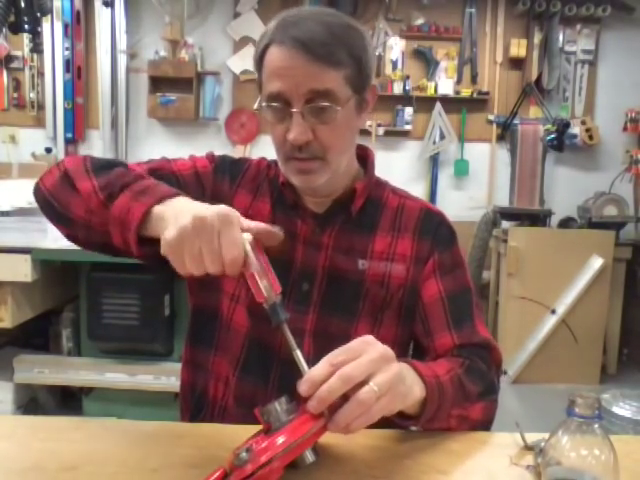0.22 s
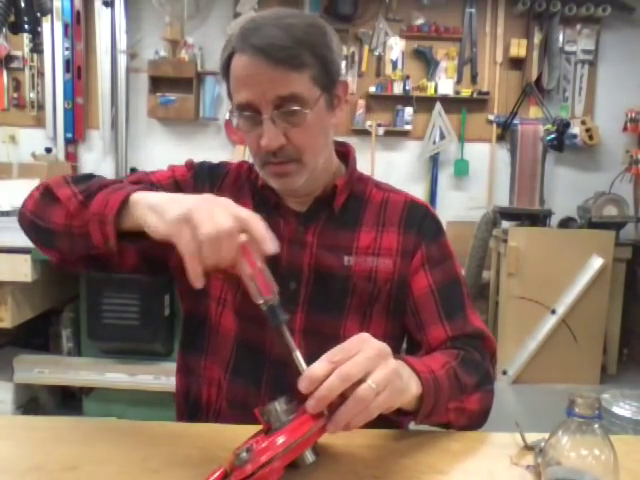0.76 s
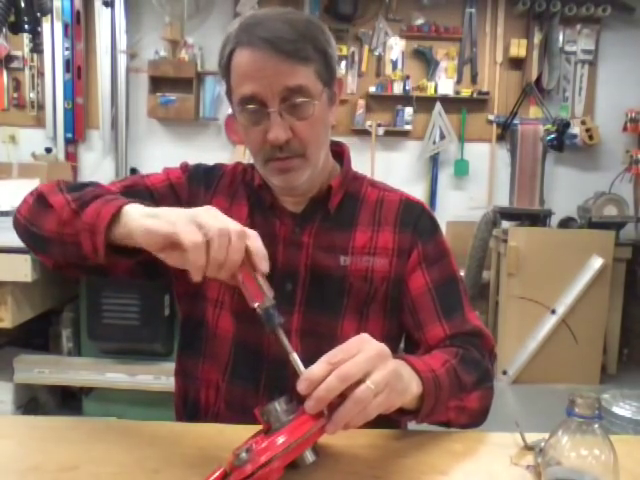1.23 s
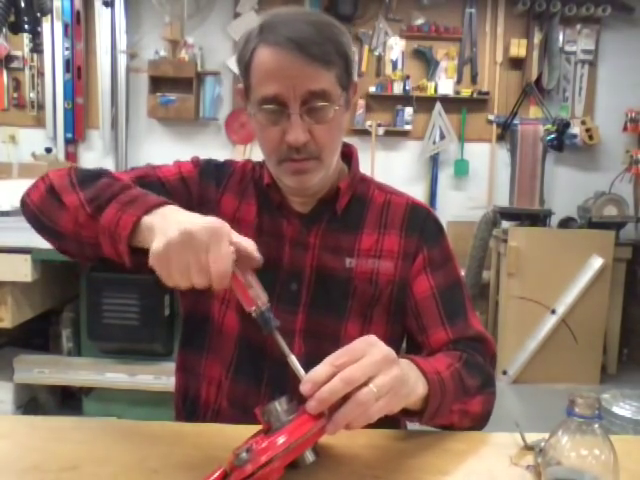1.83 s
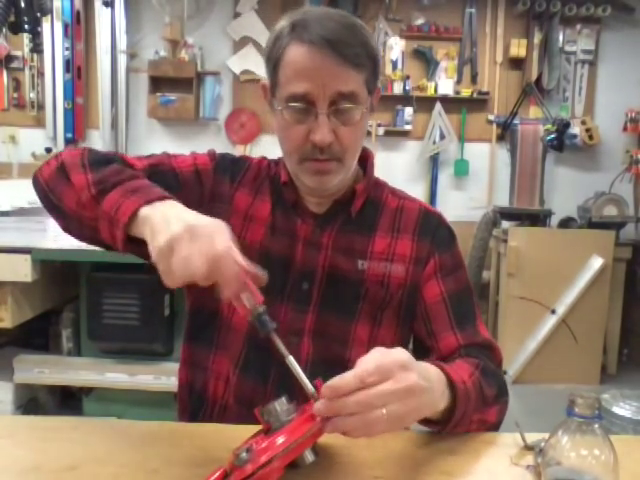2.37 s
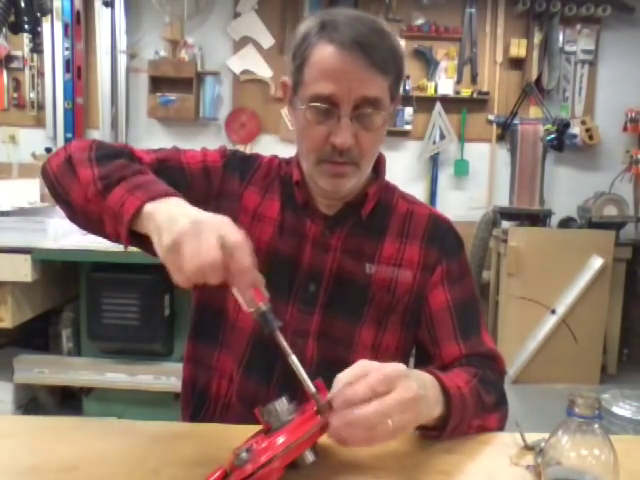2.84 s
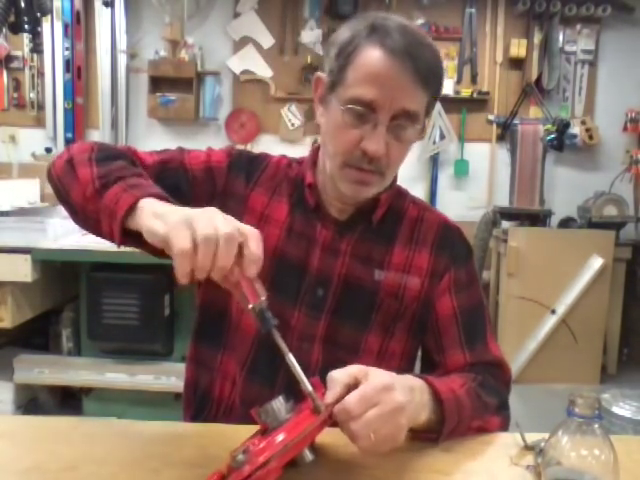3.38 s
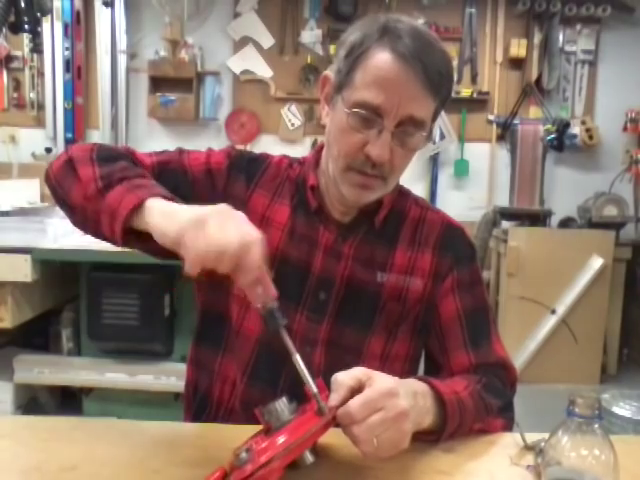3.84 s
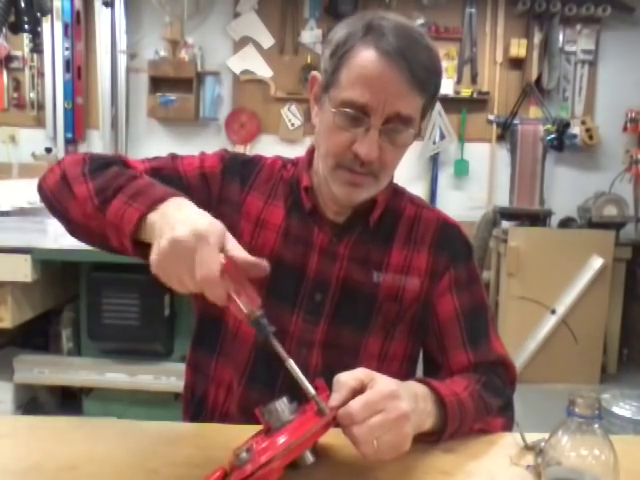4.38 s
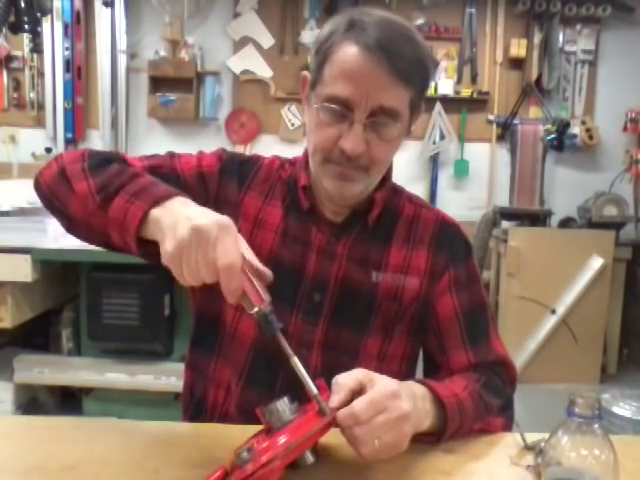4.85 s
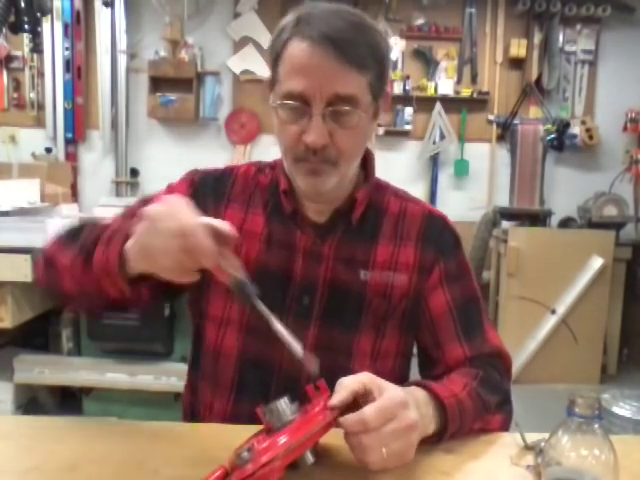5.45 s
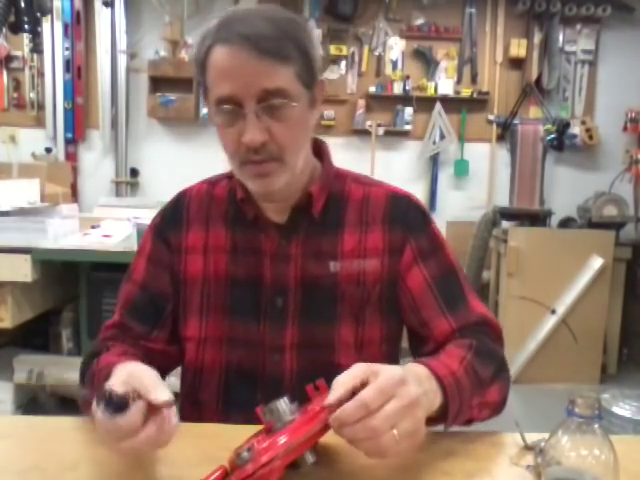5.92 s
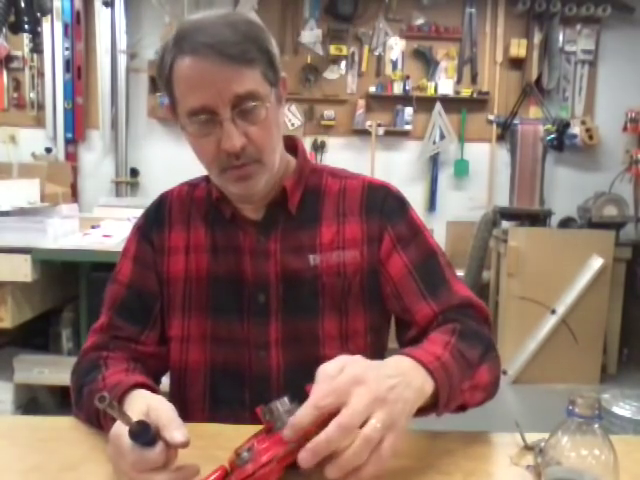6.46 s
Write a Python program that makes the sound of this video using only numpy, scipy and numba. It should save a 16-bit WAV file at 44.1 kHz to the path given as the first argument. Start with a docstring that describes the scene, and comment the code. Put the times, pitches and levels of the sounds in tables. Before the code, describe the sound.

A hand screwdriver clicks brightly and irregularly against small screws while a metal part bumps softly on a wooden bench in a workshop.

```python
"""Hiss and a pulsing high whine from a small microphone, then knocks on a wooden bench in a workshop.
A hand screwdriver turns small screws in a metal part on that bench: each blow of the steel bit, and
each knock of the part, rings a set of decaying modes. Grainy noise through the bench modes is the drag.
Echoes and a noise tail are the walls' answer; an expander holds the pauses down."""
import sys
import numpy as np
from scipy import signal
from scipy.fft import rfft, irfft
from scipy.io import wavfile
from scipy.ndimage import uniform_filter1d
from numba import njit

SR = 44100
rng = np.random.default_rng(int(sys.argv[2]) if len(sys.argv) > 2 else 0)


def transcribe(u):
    """Save the signal u as a 16-bit wav file named by the first command-line argument.

    u: samples, shape (n,) or (channels, n), limited to [-1, 1]; the rate is SR.
    q: integer samples, one column per channel.
    """
    v = np.clip(np.atleast_2d(u).T, -1, 1)
    q = np.round(v * 32767).astype(np.int16)
    wavfile.write(sys.argv[1], SR, q)


N = 295637

# modes of the wooden bench, for knocks and drag: (frequency [Hz], relative level [dB])
BENCH_MODES = [(78, -27), (101, 5), (126, -4.5), (170, 2), (226, -5.5), (257, 1.5), (320, 0), (420, 3.5),
               (540, 9), (630, 5), (880, 10.5), (1080, 11), (1400, 7), (2000, -11)]
BENCH_CYCLES = 8  # vibrations until a bench mode is 60 dB down

# the whole shop; the clutter close by and its lead over the shop
SHOP_T60_S, NEAR_T60_S, NEAR_DB = 0.47, 0.17, 2
TAIL_RISE_S = 0.00066

# bit in the screw head: the greatest bounce is relative to the first contact
BIT_CHATTER_S, BIT_BOUNCE, BIT_SPREAD_OCT = 0.006, 0.72, 0.33
BIT_TAIL_DB, BIT_TAIL_HZ = -28.5, 9300  # tail before the answer gain; duller above this
STEEL_CYCLES, PART_CYCLES, SHAFT_CYCLES = 28, 11, 70  # vibrations until -60 dB

# part against the bench
BENCH_CHATTER_S, BENCH_BOUNCE, BENCH_SPREAD_OCT = 0.01217, 0.58, 0.8
BENCH_TAIL_DB, BENCH_TAIL_HZ = -27, 462
WOOD_PUSH_S = 0.00055  # wood gives way: a longer, duller contact of about this length
BENCH_ANSWER_DB = -1.5  # the shop's answer to a knock at both reference values below
DRIER_DB_PER_DB, SOFT_KNOCK_DB = 0.4, -38  # a harder knock comes through the wood and outruns the shop
DRIER_DB_PER_OCT, DEEP_KNOCK_HZ = -0.5, 200  # a higher knock gets slightly more answer

# microphone: noise levels are those ahead of the expander
HISS_DB, WHINE_DB, WHINE_HZ = -62.5, -71, 14999  # rms; the whine's while it is on
PULSE_HZ, PULSE_START_S, PULSE_SHARE = 14.909, 0.037, 0.56  # share of each period that is on
BASS_CUT_HZ, TOP_HZ = 116, 15560
PAUSE_GAIN_DB, SWELL_KNEE_DB = -12, -75
SWELL_SLOPE = 0.36  # dB of gain per dB of level, well above the knee
SWELL_RISE_S, SWELL_FALL_S = 0.002, 0.04


def undb(db):
    """Amplitude factor of a level in dB."""
    return 10 ** (np.asarray(db) / 20)


def level(x, db):
    """Scale a sound to an rms level in dB."""
    return x * undb(db) / np.sqrt(np.mean(x ** 2))


def fade(t, t60):
    """Exponential decay, 60 dB down after t60 seconds."""
    return np.exp(-np.log(1000) * t / t60)


def coloured(points):
    """Noise with the spectrum of (Hz, dB) points, joined along log frequency."""
    hz, db = np.transpose(points)
    log_f = np.log(np.arange(1, N // 2 + 2) * SR / N)
    white = rfft(rng.standard_normal(N))
    return irfft(white * undb(np.interp(log_f, np.log(hz), db)), N)


def ring(modes, cycles, gains):
    """Answer of an object's modes to one blow, peak 1; high modes die sooner."""
    hz, db = np.transpose(modes)[:, :, None]
    t = np.arange(int(1 + cycles / hz.min() * SR)) / SR
    vibration = fade(t, cycles / hz) * np.sin(2 * np.pi * hz * t)
    sound = np.sum(gains[:, None] * undb(db) * vibration, axis=0)
    return sound / np.abs(sound).max()


def favour(modes, hz, octaves, scatter_db):
    """Each blow lands elsewhere: modes near hz answer most, with chance size and sign."""
    away = np.log2(np.array(modes)[:, 0] / hz) / max(octaves, .03)
    sign, size = rng.standard_normal((2, len(modes)))
    return np.sign(sign) * undb(scatter_db * size) / (1 + away ** 2) ** 0.77


def chatter(length_s, bounce):
    """A first contact and two bounces of chance time and size after it."""
    push = np.zeros(int(.1 * SR))
    when, size = rng.random((2, 2))
    bounce_s = np.clip(when * length_s, 0, .09)
    push[(bounce_s * SR).astype(int)] = bounce * size
    push[0] = 1
    return push


def shop(tail_db, tail_hz, answer_db):
    """Direct sound, near echoes, then a dense tail; it differs from blow to blow as hands and part move."""
    # bench and nearest walls: (delay [s], level before the answer gain [dB])
    reflections = [(.006, -4.5), (.014, -10.5), (.021, -12.5)]
    t = np.arange(int(.4 * SR)) / SR
    decay = fade(t, SHOP_T60_S) + undb(NEAR_DB) * fade(t, NEAR_T60_S)
    dull = signal.lfilter(*signal.butter(1, tail_hz, fs=SR), rng.standard_normal(len(t)))
    room = undb(tail_db) * dull * decay * (1 - np.exp(-t / TAIL_RISE_S))
    for s, db in reflections:
        room[int(s * SR)] += undb(db)
    room *= undb(answer_db)  # echoes and tail against the direct sound
    room[0] = 1
    return room


def add(out, s, db, push, room, *rings):
    """Mix in at time s what the pushes ring, heard through the shop, with its peak at db."""
    size = 24000
    modes = sum(rfft(r, size) for r in rings)
    sound = irfft(rfft(push, size) * rfft(room, size) * modes)
    i = int(s * SR)
    out[i:i + size] += (sound * undb(db) / np.abs(sound).max())[:N - i]


def electronics():
    """The microphone's own noise: hiss, faint steady tones and a high whine switched on and off."""
    # spectrum of the hiss: (frequency [Hz], relative density [dB per Hz])
    hiss_shape = [(15, -44), (25, 1), (44, -7.5), (107, -2.5), (484, -12.5), (898, -14), (1580, -16),
                  (2070, -13.5), (3270, -17.5), (6240, -15.5), (7750, -18.5), (12600, -19), (15600, -15.5)]
    # faint steady tones ahead of the expander: (frequency [Hz], level [dB rms])
    faint_tones = [(9848, -84), (2040, -86)]
    t = np.arange(N) / SR
    on = ((t - PULSE_START_S) * PULSE_HZ) % 1 < PULSE_SHARE
    switch = uniform_filter1d(1. * on, size=88)  # edges of 2 ms
    whine = undb(WHINE_DB) * switch * np.sqrt(2) * np.sin(2 * np.pi * WHINE_HZ * t)
    tones = sum(undb(db) * np.sqrt(2) * np.sin(2 * np.pi * hz * t) for hz, db in faint_tones)
    return level(coloured(hiss_shape), HISS_DB) + whine + tones


def drag():
    """The part dragging on the wood: many tiny slips of chance size ring the bench as a grainy rumble."""
    # course of the drag ahead of the microphone: (time [s], level [dB])
    drag_course = [(0.0, -64), (0.82, -74.5), (1.97, -59), (2.09, -64), (2.2, -71), (2.45, -53),
                   (2.732, -74.5), (3.99, -62), (4.14, -65), (4.39, -62), (4.7, -62), (5.2, -69),
                   (5.9, -92)]
    slips = rng.standard_normal(N) * (rng.random(N) < 700 / SR)  # about 700 a second
    wood = ring(BENCH_MODES, BENCH_CYCLES, favour(BENCH_MODES, 200, 1.2, scatter_db=1))
    rumble = signal.fftconvolve(slips, wood)[:N]
    s, db = np.transpose(drag_course)
    return level(rumble, 0) * undb(np.interp(np.arange(N) / SR, s, db, right=-100))


def knocks():
    """The part knocking on the bench: soft contacts ring the low modes of the wood."""
    # knocks ahead of the microphone: (time [s], peak level [dB], favoured pitch [Hz])
    knock_list = [(0.081, -54, 198), (0.116, -55.5, 211), (0.254, -40, 115), (0.272, -36.5, 204),
                  (0.385, -44, 430), (0.626, -48.5, 198), (0.659, -48, 490), (0.718, -39, 400),
                  (0.731, -39, 246), (0.875, -40.5, 834), (0.989, -42.5, 148), (1.042, -45, 138),
                  (1.109, -36.5, 132), (1.234, -42.5, 200), (1.292, -43, 282), (1.445, -44.5, 195),
                  (1.531, -37.5, 236), (1.565, -40.5, 300), (1.583, -37, 182), (1.691, -47.5, 200),
                  (1.704, -44, 174), (1.905, -35, 192), (1.964, -33.5, 497), (1.987, -33.5, 108),
                  (2.042, -23, 225), (2.101, -33, 192), (2.147, -31, 140), (2.313, -42.5, 129),
                  (2.346, -49, 400), (2.42, -36, 136), (2.558, -39, 350), (2.672, -37.5, 320),
                  (2.763, -27.5, 192), (2.811, -30, 197), (2.977, -46.5, 526), (3.091, -29, 495),
                  (3.222, -31, 260), (3.414, -49, 473), (3.591, -46.5, 424), (3.624, -38.5, 530),
                  (3.836, -41.5, 520), (3.899, -35, 142), (3.97, -28, 580), (4.038, -39, 129),
                  (4.122, -43.5, 296), (4.295, -47.5, 242), (4.438, -41, 436), (4.533, -30.5, 203),
                  (4.672, -38.5, 295), (4.769, -42.5, 420), (4.851, -39.5, 199), (4.885, -36.5, 593),
                  (4.994, -34, 179), (5.115, -43, 435), (5.254, -42, 320), (5.333, -44.5, 117),
                  (5.565, -35, 197), (5.62, -51, 229)]
    out = np.zeros(N)
    for s, db, hz in knock_list:
        gains = favour(BENCH_MODES, hz, BENCH_SPREAD_OCT, scatter_db=2.5)
        knock = ring(BENCH_MODES, BENCH_CYCLES, gains)
        soft_contact = np.hanning(int(WOOD_PUSH_S * SR) + 3)
        push = np.convolve(chatter(BENCH_CHATTER_S, BENCH_BOUNCE), soft_contact)
        drier_db = DRIER_DB_PER_DB * (db - SOFT_KNOCK_DB)
        drier_db += DRIER_DB_PER_OCT * np.log2(hz / DEEP_KNOCK_HZ)
        room = shop(BENCH_TAIL_DB, BENCH_TAIL_HZ, BENCH_ANSWER_DB - drier_db)
        add(out, s, db, push, room, knock)
    return out


def bit():
    """Steel on steel: a short bright tick, the part below it, sometimes the shaft singing on."""
    # clicks ahead of the microphone: (time [s], peak level [dB], favoured pitch [Hz],
    # part against tick [dB], shaft against tick [dB], echoes and tail [dB])
    click_list = [(0.118, -48, 6070, 3, -14, -6), (0.877, -40, 6300, 1, -30, -7),
                  (1.047, -47, 3600, 2, -20, -12), (1.107, -45, 6500, 3, -19, -13),
                  (1.298, -41, 4800, 0, -29, -8.5), (1.381, -45, 4500, -5, -12, -14),
                  (1.518, -40.5, 6360, 1.5, -30, 1), (1.702, -36, 6300, -4, -33, -10),
                  (1.709, -38.5, 6140, -8, -22, -10), (1.837, -52.5, 6550, -17, -15, -2),
                  (1.8903, -36, 3330, -1, -16, -3), (1.9626, -36, 3530, 21.5, 4, -5),
                  (1.9764, -39, 3870, 15, -19, -7), (2.0436, -44, 5870, 32, -26, -5.5),
                  (2.0994, -40, 5740, 20, -15, -6.5), (2.123, -30, 6450, -4.5, -38, -4),
                  (2.1982, -43, 6100, 6, -23, -4.5), (2.4233, -44, 3590, 2.5, -9, -7),
                  (2.5559, -30.5, 5410, -41, 3.5, -3), (2.7241, -43.5, 6140, -5, -25, -7),
                  (2.7433, -33, 6770, -4, -37, -3), (2.9735, -34, 6150, -6.5, -4, -4),
                  (3.0904, -41.5, 3950, 7, -21, -8), (3.1379, -36.5, 5700, -9.5, 2.5, 3),
                  (3.2096, -27.5, 6900, -17, -22, -4), (3.2249, -27.5, 3800, -10, -11, -6.5),
                  (3.413, -35.5, 5800, -12, -32, -3), (3.6177, -30, 6000, -6, -22, -10),
                  (3.6208, -25, 5300, -11.5, 3, -4), (3.8329, -30, 5640, -9.5, -8, -2.5),
                  (3.8624, -35, 6270, -2, -25, -9), (4.0281, -34.5, 7050, -35, -12, -3.5),
                  (4.0345, -27, 6800, -6, -11, -9), (4.128, -46.5, 6460, -2.5, -19, 1),
                  (4.2436, -44, 5230, -10, -26, -7), (4.2913, -36, 5460, -13, -5, -5),
                  (4.2965, -34.5, 5660, -6, -6.5, -6.5), (4.4243, -39, 5630, -7, -32, 3),
                  (4.4343, -35, 6070, -5, -33, -1.5), (4.534, -48, 6190, 16, -19, -8),
                  (4.6706, -36, 5740, -28, -10, -5), (4.677, -29.5, 5700, -14, -5, -4.5),
                  (4.8795, -27.5, 5570, -14, -17, -2), (4.893, -28.5, 5500, 1.5, -15, -4.5),
                  (5.1164, -38, 5880, -6, -34, -3), (5.142, -34.5, 6000, -20, -18, -10),
                  (5.2472, -31.5, 5600, -27, -29, -5), (5.2623, -33.5, 6060, -2, -22, -2),
                  (5.5184, -42, 6630, -5, -24, -5), (5.5726, -51, 4100, 7, -25, -3),
                  (5.63, -54, 6710, 10, -22, -4), (5.699, -60.5, 4920, 7, -22, -6),
                  (5.907, -40.5, 6100, -26, -23, -13), (5.9966, -34.5, 5900, -43, -30, -7),
                  (6.007, -37, 4600, -42, -28, -6), (6.0195, -46, 4700, -40, -16, -8),
                  (6.106, -33, 6600, -45, -22, -14), (6.1214, -42, 6300, -29, -25, -4),
                  (6.274, -51.5, 5830, -33, -28, 2), (6.4889, -40.5, 5860, -40, -18, -5),
                  (6.499, -45, 4500, -41, -42, -10)]
    # modes of bit and screw: (frequency [Hz], relative level [dB])
    steel_modes = [(3550, 7.5), (4100, 8), (4550, 7.5), (5000, 4.5), (5300, 2), (5700, 9), (6150, 11),
                   (6500, 12.5), (7000, 8.5), (7400, 2.5), (8500, -35), (10500, 5)]
    # modes of the metal part: (frequency [Hz], relative level [dB])
    part_modes = [(1200, -4), (1500, -22), (1900, -2), (2350, -1.5), (2750, -21.5), (3100, -0.5)]
    # modes of the free shaft, which rings longer: (frequency [Hz], relative level [dB])
    shaft_modes = [(5070, -4), (5250, 0), (5420, -3)]
    out = np.zeros(N)
    for s, db, hz, part_db, shaft_db, answer_db in click_list:
        tick = ring(steel_modes, STEEL_CYCLES, favour(steel_modes, hz, BIT_SPREAD_OCT, scatter_db=1))
        part = ring(part_modes, PART_CYCLES, favour(part_modes, 2300, 3.2, scatter_db=2))
        shaft = ring(shaft_modes, SHAFT_CYCLES, favour(shaft_modes, 5700, 1, scatter_db=1))
        push = chatter(BIT_CHATTER_S, BIT_BOUNCE)
        room = shop(BIT_TAIL_DB, BIT_TAIL_HZ, answer_db)
        add(out, s, db, push, room, tick, undb(part_db) * part, undb(shaft_db) * shaft)
    return out


def scene():
    """Everything on the bench, as one channel ahead of the microphone."""
    return (drag() + knocks() + bit())[None]


@njit
def follow(power, rise, fall):
    """Running power that rises fast and falls slowly."""
    out, e = np.empty(len(power)), 0.
    for i in range(len(power)):
        e += (power[i] - e) * (rise if power[i] > e else fall)
        out[i] = e
    return out


def record(dry):
    """The capsule loses deep bass and adds noise; an expander turns all down in pauses; the top is cut."""
    bass_cut = signal.butter(3, BASS_CUT_HZ, "high", fs=SR, output="sos")
    dry = signal.sosfilt(bass_cut, dry)
    short_power = uniform_filter1d(dry[0] ** 2, size=64)
    power = follow(short_power, 1 / (SWELL_RISE_S * SR), 1 / (SWELL_FALL_S * SR))
    swell = (1 + power / undb(SWELL_KNEE_DB) ** 2) ** (SWELL_SLOPE / 2)
    gain = undb(PAUSE_GAIN_DB) * swell
    top_cut = signal.ellip(10, .2, 60, TOP_HZ, fs=SR, output="sos")
    return signal.sosfilt(top_cut, gain * (dry + electronics()))


dry = scene()
out = record(dry)
transcribe(out)
```